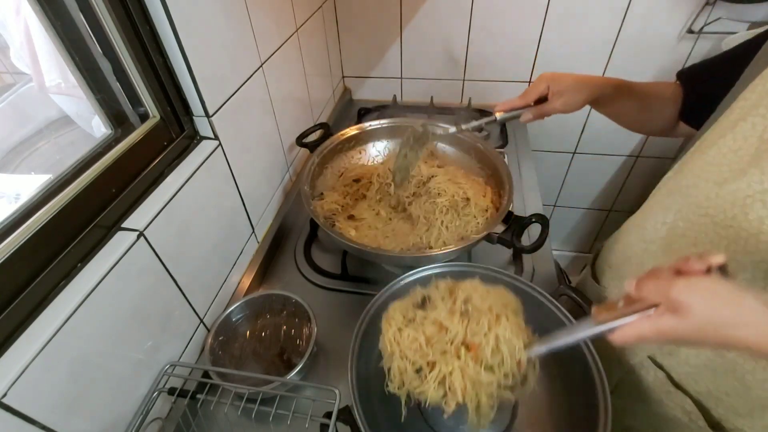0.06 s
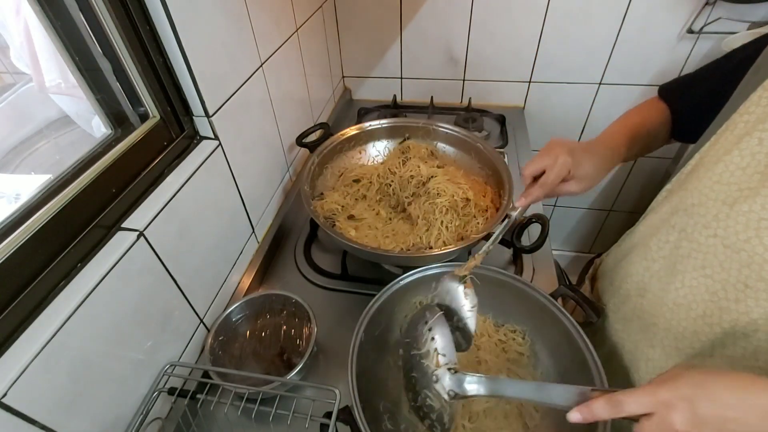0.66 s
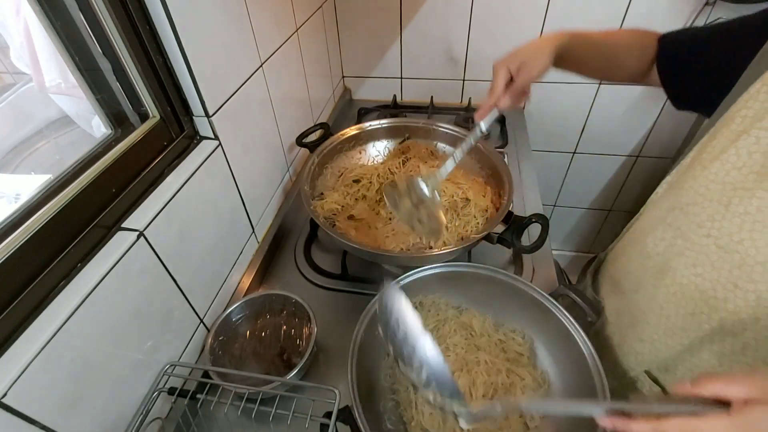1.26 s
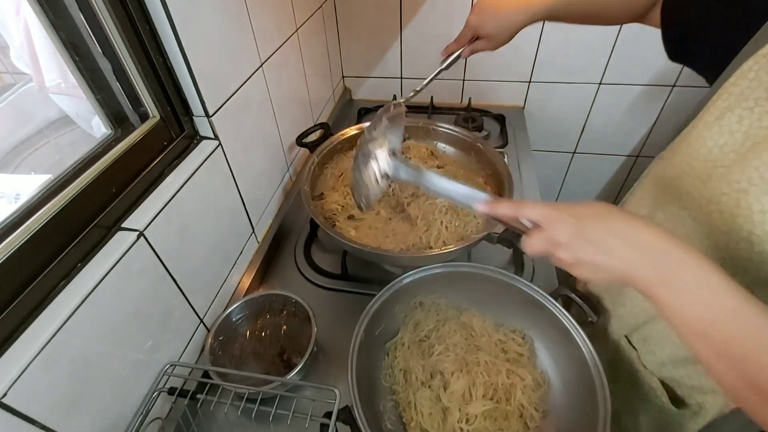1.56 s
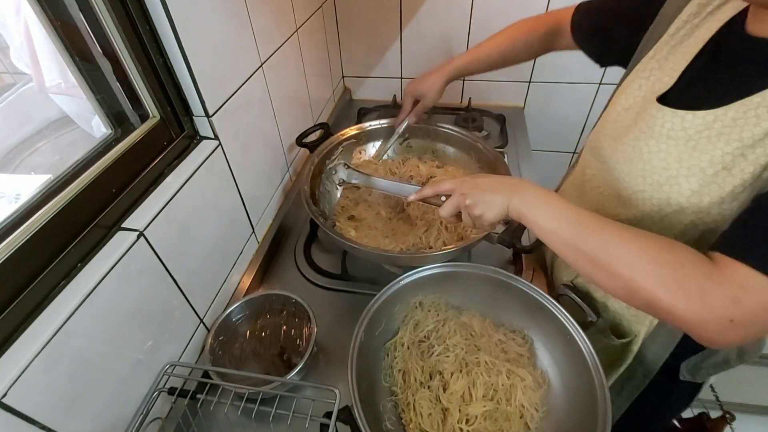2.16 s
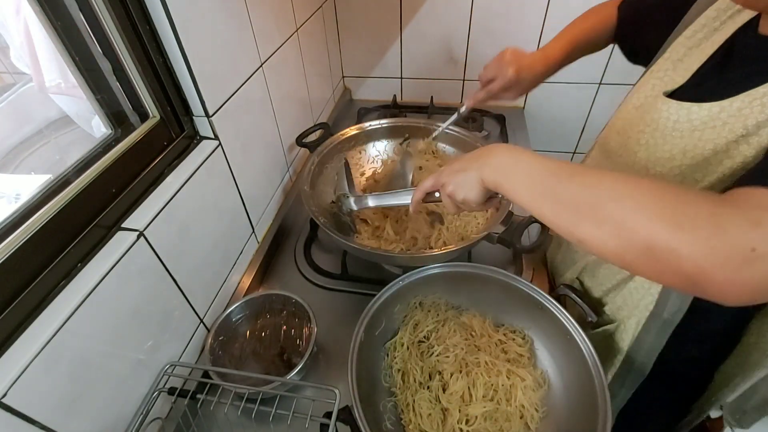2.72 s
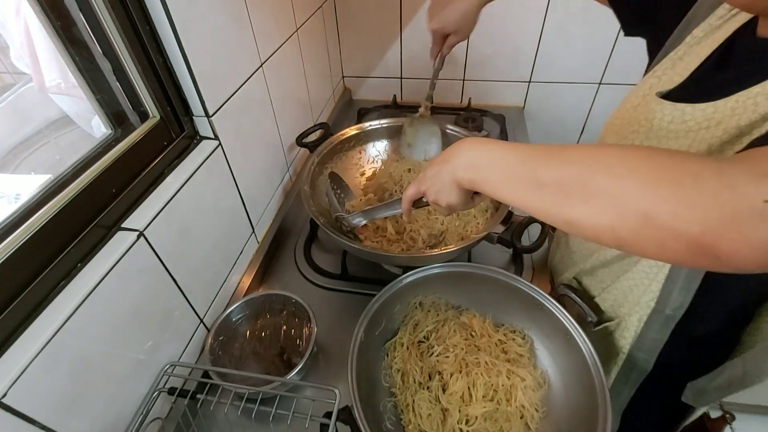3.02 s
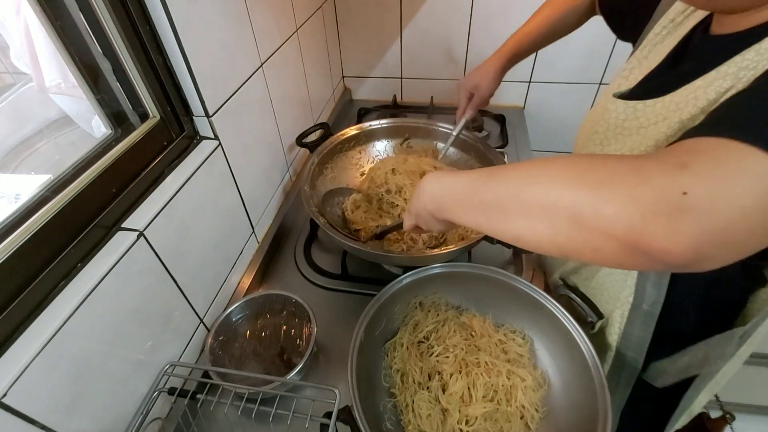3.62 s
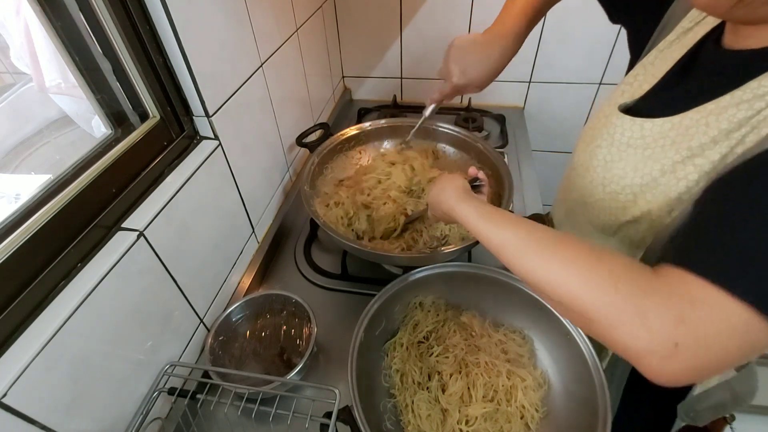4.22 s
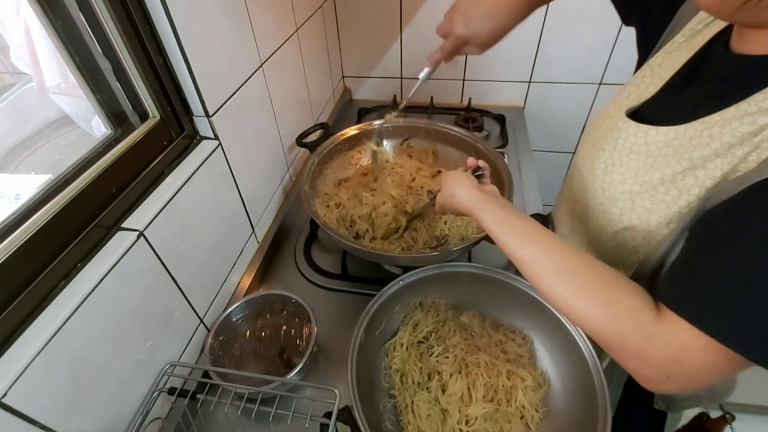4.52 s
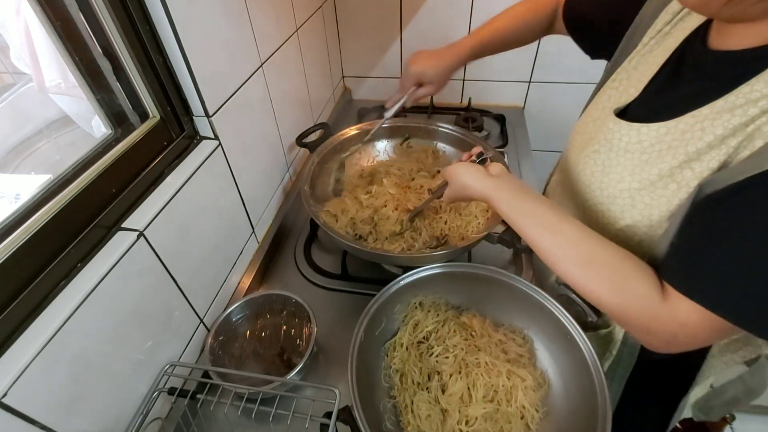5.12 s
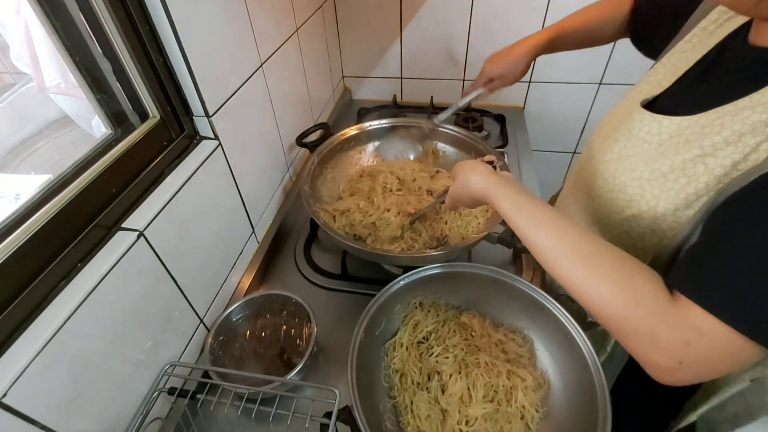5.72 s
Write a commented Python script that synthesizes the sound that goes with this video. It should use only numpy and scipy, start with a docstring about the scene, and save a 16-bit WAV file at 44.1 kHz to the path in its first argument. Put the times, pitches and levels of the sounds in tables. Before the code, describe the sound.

Wet noodles plop into a steel bowl, then a ladle and spatula clink, knock and scrape against a wok over a low hum.

```python
"""Wet noodles squish and plop into a steel bowl, moved from a steel wok with a ladle and a spatula.
The utensils clink, tap and knock: each blow is a sharp crack, then ringing steel in a small tiled kitchen.
A blade scrapes the wok in tiny stick-slip clicks, and pushes rock the wok on the stove with dull thuds.
The strands smack as they part and pockets of sauce pop, over a low steady room noise with a motor hum."""
import sys
import numpy as np
from scipy import signal
from scipy.fft import rfft, irfft, next_fast_len
from scipy.io import wavfile

SR = 44100
rng = np.random.default_rng(int(sys.argv[2]) if len(sys.argv) > 2 else 0)


def unload_audio(sound):
    """Save the sound as a 16-bit wav file, at the path given as the first command line argument."""
    columns = np.transpose(np.atleast_2d(sound))
    # keep every value between -1 and 1, then stretch to whole-number steps
    steps = np.round(np.clip(columns, -1, 1) * 32767)
    wavfile.write(sys.argv[1], SR, steps.astype(np.int16))


N = 263409

# ringing modes of the wok: (frequency [Hz], level [dB], t60 [s])
WOK_MODES = [(411, -17, .3), (463, -11, .3), (671, -14, .23), (810, -15, .2), (1770, -10.5, .3),
             (1895, -14, .26), (2322, -8, .36), (2403, -11, .3), (283, -25, .5), (1264, -21, .3),
             (1600, -15, .3), (3050, -17, .45), (3340, -11, .35), (3655, -15, .3), (3903, -11, .2),
             (4515, -10, .33), (5241, -13, .35), (7380, -14, .25), (8270, -12, .25), (11800, -14, .25)]
# how alike left and right are in the kitchen: (frequency [Hz], correlation [0-1])
STEREO_LIKENESS = [(60, .98), (130, 0.89), (300, 0.53), (600, 0.36), (1200, 0.29), (2500, 0.089), (5000, 0)]


def from_db(db):
    """Decibels to gain."""
    return 10 ** (np.asarray(db) / 20)


def rms_one(x):
    """Scale to unit power."""
    return x / np.sqrt(np.mean(x ** 2) + 1e-20)


def at_hz(points, hz):
    """Read a table along log frequency."""
    freqs, values = np.transpose(points)
    return np.interp(np.log(np.maximum(hz, 1)), np.log(freqs), values)


def add(out, start_s, sound):
    """Mix a sound in at a given time."""
    start = max(round(start_s * SR), 0)
    out[:, start:start + sound.shape[-1]] += sound[:, :max(N - start, 0)]


def colour(x, spectrum):
    """Minimum-phase EQ that follows a curve of (frequency [Hz], gain [dB])."""
    size = 2 * next_fast_len(x.shape[-1] // 2 + 2048)
    cepstrum = irfft(np.log(from_db(at_hz(spectrum, np.fft.rfftfreq(size, 1 / SR)))))
    cepstrum[1:size // 2] *= 2
    cepstrum[size // 2 + 1:] = 0
    return irfft(rfft(x, size) * np.exp(rfft(cepstrum)))[..., :x.shape[-1]]


def bell_eq(x, hz, gain_db, q):
    """Boost or cut one narrow band."""
    return x + (from_db(gain_db) - 1) * signal.lfilter(*signal.iirpeak(hz, q, SR), x)


def diffuse(size):
    """White stereo noise, centred in the bass and wide in the treble."""
    padded = 2 * next_fast_len(size // 2 + 1)
    mid, side = rfft(rng.standard_normal((2, padded)))
    alike = np.clip(at_hz(STEREO_LIKENESS, np.fft.rfftfreq(padded, 1 / SR)), -1, 1)
    return irfft(np.sqrt(1 + alike) * mid + np.sqrt(1 - alike) * side * [[1], [-1]])[:, :size]


def drift(size, per_s):
    """Random modulation that glides between values of spread 1."""
    return np.interp(np.arange(size) / SR * per_s, np.arange(4096), rng.standard_normal(4096))


def slips(size, per_s, spread_db):
    """Stick-slip clicks at random times; a spread makes their strength uneven."""
    strength = from_db(spread_db * np.minimum(rng.exponential(1, size), 4)) * rng.choice([-1, 1], size)
    return rms_one(strength * (rng.random(size) < per_s / SR))


def swell(t, peak_s):
    """Rise to 1 at the given time, then die away."""
    return t / peak_s * np.exp(1 - t / peak_s)


def room_noise(rush_db=-45.5, waver_db=3.5):
    """A low rush with a faint wavering motor hum; the whole bed gently rises and sinks."""
    # partials of the motor: (frequency [Hz], level [dB])
    hum_partials = [(141, -61.5), (284, -63.5), (413, -59)]
    # colour of the rush: (frequency [Hz], gain [dB])
    rush_spectrum = [(15, -73.5), (25, -47.5), (48, -33.5), (114, -13.5), (134, -14.5), (190, -9.5),
                     (217, -18), (285, -4), (384, -12.5), (476, -14), (775, -25), (887, -20.5), (1440, -45),
                     (9320, -64), (16000, -49)]
    # fader ride on the bed: (time [s], gain [dB])
    bed_ride = [(1.3, -2), (2.8, 0.5), (4.4, -2), (5.4, -4)]
    t, hum = np.arange(N) / SR, 0
    for hz, db in hum_partials:
        amplitude = np.sqrt(2) * from_db(db + waver_db * drift(N, per_s=17))
        hum += amplitude * np.sin(2 * np.pi * hz * t + drift(N, per_s=7))
    rush = from_db(rush_db) * rms_one(colour(diffuse(N), rush_spectrum))
    return (hum + rush) * from_db(np.interp(t, *np.transpose(bed_ride)))


def handling(attack_s=0.89, settle_db_per_s=10, resting_db=-64.5):
    """Envelope of the noodles: it rises, holds while they move and sinks to a floor as they settle."""
    # noodles tipped into the bowl, then turned in the wok: (start [s], hold [s], level [dB])
    moves = [(0, 0.13, -51), (2.305, 1.37, -54)]
    t, power = np.arange(N) / SR, from_db(resting_db) ** 2
    for start, hold, db in moves:
        attack = np.clip(1 + (t - start) / attack_s, 0, 1)   # fully open at the start
        settled_db = settle_db_per_s * np.maximum(t - start - hold, 0)
        power = power + (attack * from_db(db - settled_db)) ** 2
    return np.sqrt(power)


def noodles(flutter_db=1.5, places=5):
    """Wet strands part with tiny smacks all over the heap, each place blurred its own way by the tiles."""
    # colour of the squish: (frequency [Hz], gain [dB])
    squish_spectrum = [(400, -3), (800, 5), (1400, 0), (2400, -7.5), (3600, -15.5), (5500, -16),
                       (7800, -16), (10000, -27), (16000, -28.5)]
    t, heap = np.arange(SR // 4) / SR, 0
    flutter = from_db(flutter_db * drift(N, per_s=57))
    for _ in range(places):
        smacks = slips(N, per_s=600, spread_db=-1.5) * flutter
        tiles = diffuse(len(t)) * (np.exp(-t / 0.045) + 4 * np.exp(-t / 0.0045))
        heap += signal.oaconvolve(smacks[None], tiles, axes=1)[:, :N]
    return handling() * rms_one(colour(heap, squish_spectrum))


def sauce_pops(per_s=36, decay_cycles=5, level_db=-58, until_s=0.78):
    """As the noodles slump into the bowl, pockets of sauce pop between the strands and ring briefly."""
    out, t = np.zeros((2, N)), np.arange(SR // 6) / SR
    tiles = diffuse(len(t)) * (np.exp(-t / 0.05) + 4 * np.exp(-t / 0.0022))
    for when, smallness, softness in rng.random((round(per_s * until_s), 3)):
        hz = 1100 * 3.2 ** smallness
        ring = np.exp(-t * hz / decay_cycles) * np.sin(2 * np.pi * hz * t)
        pop = signal.fftconvolve(tiles, ring[None], axes=1)[:, :len(t)]
        add(out, when * until_s, from_db(level_db - 10 * softness - 4.4 * smallness) * rms_one(pop))
    return out


def tile_wash(t, modes, early_db, hump_width=0.062, hump_db=9, valley_db=-0.5):
    """The tiles throw back what the steel radiates: early reflections and a tail rich around its modes."""
    # ring-out of steel and tiles together: (frequency [Hz], t60 [s])
    ring_out = [(200, 0.71), (700, 0.35), (2000, 0.34), (4500, 0.34), (9000, 0.35), (16000, 0.27)]
    hz = np.fft.rfftfreq(len(t), 1 / SR)
    humps = sum(from_db(db + hump_db) ** 2 / (1 + ((hz / mode_hz - 1) / hump_width) ** 2) ** 2
                for mode_hz, db, _ in modes)
    noise = irfft(rfft(diffuse(len(t))) * np.sqrt(from_db(valley_db) ** 2 + humps), len(t))
    band_hz, frame_s, bands = signal.stft(noise, SR, nperseg=256)
    decay = from_db(-60 * frame_s / at_hz(ring_out, band_hz)[:, None])
    tail = signal.istft(bands * decay, SR)[1][:, :len(t)]
    return tail * (1 + from_db(early_db) * np.exp(-t / 0.0031))


def steel(modes, modes_db, early_db, split, count=5):
    """Steel rings in the kitchen; the uneven sheet splits each mode into close partials that beat."""
    t = np.arange(SR // 2) / SR
    ring = tile_wash(t, modes, early_db)
    for hz, db, t60 in modes:
        detune = np.linspace(-1, 1, count) + rng.normal(0, .15, count)
        weight = rms_one(np.exp(-detune ** 2)) / np.sqrt(count)
        width = 1 - np.clip(at_hz(STEREO_LIKENESS, hz), 0, 1)
        right_shift = width * rng.uniform(-np.pi, np.pi, count)   # each side beats differently
        phase = rng.uniform(0, 2 * np.pi, count) + np.outer([0, 1], right_shift)
        angle = np.outer(2 * np.pi * hz * (1 + split * detune), t).astype(np.float32)
        partials = (weight * np.cos(phase)) @ np.sin(angle) + (weight * np.sin(phase)) @ np.cos(angle)
        ring += from_db(db + modes_db) * np.exp(-np.log(1000) * t / t60) * partials
    return ring


def contact_colour(tone, edge):
    """EQ curve of a contact as the blade tips from its flat (edge = 0) onto its edge (edge = 1)."""
    # thin steel radiates little bass: (frequency [Hz], gain against the tone's lowest point [dB])
    bass_loss = [(70, -27.5), (200, -8), (330, 3)]
    hz, flat_db, edge_db = np.transpose(tone)
    db = flat_db + np.clip(edge, 0, 1) * (edge_db - flat_db)
    return [(low_hz, db[0] + gain_db) for low_hz, gain_db in bass_loss] + list(zip(hz, db))


def wok_scrapes(judder_db=2.3):
    """The blade sticks, slips and judders over the wok, and noodles land and slide with a like gritty friction;
    pressure rises and falls through each stroke."""
    # strokes (those at 0.26 s and 0.374 s are noodles landing and sliding): (start [s], rise [s], length [s],
    # level [dB], edge [0-1], blade resonance [Hz], gain [dB])
    strokes = [(0.014, 0.05, 0.055, -46, 0.57, 1600, 22), (0.26, 0.039, 0.18, -45.5, 0.88, 1310, 18),
               (0.374, .045, 0.24, -43.5, 0.17, 1320, -1), (1.864, 0.018, 0.36, -37, 0.64, 1820, 6.5),
               (1.971, 0.017, 0.21, -29, 0.36, 585, -1.5), (2.141, 0.016, 0.16, -27, 0.68, 1695, 13.5),
               (2.439, 0.078, 0.084, -27.5, 0.15, 2520, 3), (3.24, 0.066, 0.38, -39, 0.25, 770, 0.5),
               (3.437, 0.06, 0.21, -30, 0.08, 477, 15), (4.059, 0.014, 0.13, -46, 0.8, 1300, 16),
               (4.807, 0.0072, 0.24, -31.5, 0.43, 2360, 6.5), (4.846, .045, 0.18, -24, 0.97, 3400, 6.5),
               (5.76, 0.01, 0.057, -32, 0.15, 450, 13.5)]
    # colour of a scrape: (frequency [Hz], gain on the flat [dB], gain on the edge [dB])
    scrape_tone = [(450, 5, -1), (780, 5.5, -3), (1050, 9.5, -1.5), (1780, -1, 0), (4600, -13.5, 2),
                   (10400, -21.5, -2)]
    out, t = np.zeros((2, N)), np.arange(SR // 2) / SR
    for start, rise, length, db, edge, blade_hz, blade_db in strokes:
        pressure = np.interp(t, [0, min(rise, length), length], [0, 1, 0])
        friction = slips(len(t), per_s=700, spread_db=0)
        judder = from_db(judder_db * drift(len(t), per_s=180))
        force = bell_eq(pressure * friction * judder, blade_hz, blade_db, q=6.2)
        wok = steel(WOK_MODES, modes_db=-5.5, early_db=15, split=0.012)
        scrape = signal.fftconvolve(force[None], wok / np.sqrt(np.sum(wok ** 2) / 2), axes=1)
        add(out, start, from_db(db) * colour(scrape, contact_colour(scrape_tone, edge)))
    return out


def blows(hits, modes, tone, modes_db, early_db, crack_db, crack_cutoff_hz, split=0.006, spot_db=8):
    """Each hit gives a sharp direct crack, then the steel rings, with the struck spot's pitch lifted."""
    out, impulse = np.zeros((2, N)), signal.unit_impulse(64)
    crack = signal.lfilter(*signal.butter(2, crack_cutoff_hz, fs=SR), impulse)
    for start, db, edge, crack_trim_db, spot_hz in hits:
        hit = bell_eq(steel(modes, modes_db, early_db, split), spot_hz, spot_db, q=24)
        hit[:, :len(crack)] += from_db(crack_db + crack_trim_db) * crack
        add(out, start, from_db(db) * colour(hit, contact_colour(tone, edge)))
    return out


def ladle_clinks():
    """The ladle rings brightly as the utensils clink on each other and on the bowl."""
    # clinks: (time [s], level [dB], edge [0-1], crack trim [dB], pitch of the struck spot [Hz])
    clinks = [(.245, -42, 0.22, -3, 7600), (.298, -40.5, 0.24, -1, 1500), (.711, -30, 0.74, 6, 3330),
              (.837, -43.5, 0.68, 4.5, 12000), (.875, -48.5, 0.67, 11, 5500)]
    # ringing modes of the ladle: (frequency [Hz], level [dB], t60 [s])
    ladle_modes = [(1444, -4.5, 0.14), (1600, -8, 0.26), (2580, -6.5, 0.34), (3050, -16.5, 0.52),
                   (3350, -5.5, 0.24), (3635, -17, 0.15), (4230, -1, 0.22), (5530, -5.5, 0.36),
                   (7400, -6, 0.32), (8140, -1.5, 0.25), (11070, -20.5, 0.32), (10850, -8, 0.24),
                   (13580, -6, .18)]
    # colour of a clink: (frequency [Hz], gain on the flat [dB], gain on the edge [dB])
    clink_tone = [(520, 6.5, -11), (1900, 3.5, -4.5), (4600, -13.5, -0.5), (10600, -19, 9)]
    return blows(clinks, ladle_modes, clink_tone, modes_db=-2.5, early_db=5.5,
                 crack_db=23.5, crack_cutoff_hz=11900)


def thuds(pushes, hz, swell_s, rumble_db, sway_db, sway_s, stove_hz=61.5):
    """A push sets a heavy low resonance swelling and dying; the stove top sways and rumbles along."""
    # colour of the rumble: (frequency [Hz], gain [dB])
    rumble_spectrum = [(20, -29), (50, -4), (78, -3.5), (130, 1), (300, -6), (900, -29.5), (4000, -47)]
    out, t = np.zeros((2, N)), np.arange(SR) / SR
    for start, db in pushes:
        rumble = from_db(rumble_db) * rms_one(colour(diffuse(len(t)), rumble_spectrum))
        body = swell(t, swell_s) * (np.sqrt(2) * np.sin(2 * np.pi * hz * t) + rumble)
        sway = swell(t, sway_s) * from_db(sway_db) * np.sqrt(2) * np.sin(2 * np.pi * stove_hz * t)
        add(out, start, from_db(db) * (body + sway))
    return out


def heap_landing():
    """The heap of noodles drops into the bowl with one short, soft thump."""
    # impact of the heap: (time [s], level [dB])
    landing = [(.286, -33)]
    return thuds(landing, hz=94.6, swell_s=0.023, rumble_db=-9, sway_db=-4, sway_s=0.04)


def spatula_taps():
    """Light taps set the spatula blade ringing, thin and high."""
    # taps: (time [s], level [dB], edge [0-1], crack trim [dB], pitch of the struck spot [Hz])
    taps = [(.963, -47.5, 0.19, 21, 4600), (.994, -47, 0.97, -4, 5530), (1.167, -52, 0.32, -5, 4300),
            (5.169, -44.5, 1, 2, 5000), (5.178, -30.5, 0.43, -6, 4500)]
    # ringing modes of the spatula: (frequency [Hz], level [dB], t60 [s])
    spatula_modes = [(2985, -8.5, 0.36), (3650, -8.5, 0.4), (4100, -15, 0.078), (4600, -26.5, 0.21),
                     (4883, -20, 0.19), (5100, -7, 0.14), (7540, -3, 0.31), (11500, -6, .22),
                     (13140, -8, 0.32), (13800, -19, .2)]
    # colour of a tap: (frequency [Hz], gain on the flat [dB], gain on the edge [dB])
    tap_tone = [(520, -17, -18), (1990, -20, -5), (4600, -2, -6), (10600, -10.5, -7.5)]
    return blows(taps, spatula_modes, tap_tone, modes_db=-0.5, early_db=6,
                 crack_db=14, crack_cutoff_hz=12070, split=0.0146, spot_db=11)


def wok_rocking():
    """Each push rocks the wok on the stove with a dull thud."""
    # pushes on the wok: (time [s], level [dB])
    pushes = [(1.012, -48), (1.708, -46), (1.925, -38.5), (2.006, -33), (2.499, -41.5), (3.35, -43.5),
              (3.45, -47.5), (4.06, -47.5), (4.803, -45), (5.783, -41.5)]
    return thuds(pushes, hz=104, swell_s=0.042, rumble_db=-3, sway_db=-19, sway_s=0.17)


def wok_knocks():
    """A utensil knocks on the wok and the steel sheet clangs."""
    # knocks: (time [s], level [dB], edge [0-1], crack trim [dB], pitch of the struck spot [Hz])
    knocks = [(1.699, -23.5, 0.58, -1.5, 460), (1.820, -36.5, 0.34, -0.5, 980),
              (1.869, -37.5, 0.42, 3, 1830), (1.979, -26.5, 0.88, -8, 580), (2.087, -35, 0.73, -10, 1700),
              (2.432, -32, 0.12, -22, 2230), (2.468, -26.5, 0.069, -11, 2490),
              (2.494, -33.5, 0.64, 5, 2150), (4.049, -36.5, 0.8, 2.5, 1450), (4.279, -55.5, 0.8, -13, 4070),
              (4.802, -9.5, 0.058, 3, 698), (5.758, -34.5, 0.76, -14, 2790)]
    # colour of a knock: (frequency [Hz], gain on the flat [dB], gain on the edge [dB])
    knock_tone = [(450, -9, 5), (790, -4.5, 1), (1090, -6.5, -0.5), (1766, 1, -7), (3400, -16, 0.5),
                  (4800, -22.5, -1), (10600, -37.5, 2.5)]
    return blows(knocks, WOK_MODES, knock_tone, modes_db=-1, early_db=-9.5,
                 crack_db=26, crack_cutoff_hz=4500)


def scene():
    """Steel, thuds, food and room, panned a little to the right."""
    # stereo balance: (frequency [Hz], left minus right [dB])
    balance = [(60, -2.5), (130, -1.5), (300, -8.5), (700, -2.5), (2000, -5.5), (4000, -2.5), (6500, -1.5),
               (8800, -12), (11000, -7.5), (14000, -9.5)]
    metal = wok_knocks() + ladle_clinks() + spatula_taps() + wok_scrapes()
    low_end = wok_rocking() + heap_landing()
    food = noodles() + sauce_pops()
    mix = metal + low_end + food + room_noise()
    size = 2 * next_fast_len(N // 2 + 2048)
    left_ratio = from_db(at_hz(balance, np.fft.rfftfreq(size, 1 / SR)))
    right = np.sqrt(2 / (1 + left_ratio ** 2))   # constant-power pan
    return irfft(rfft(mix, size) * [right * left_ratio, right])[:, :N]


def record(dry, cutoff_hz=15750):
    """Soft clipping rounds the highest peak and a steep low-pass cuts the top."""
    return signal.sosfilt(signal.ellip(10, .2, 80, cutoff_hz, fs=SR, output="sos"), np.tanh(dry))


dry = scene()
out = record(dry)
unload_audio(out)
```